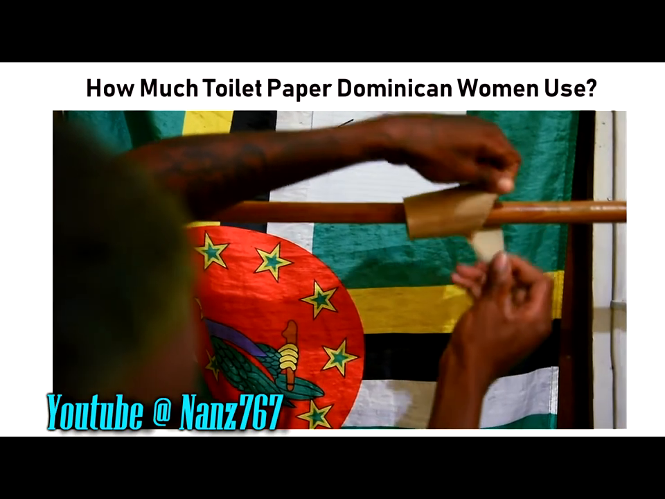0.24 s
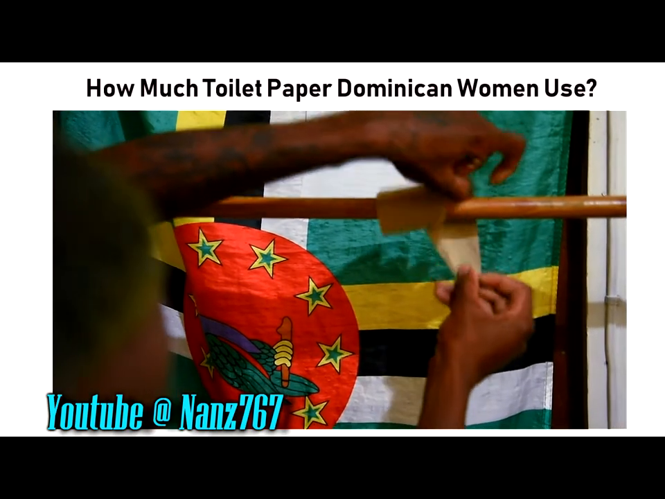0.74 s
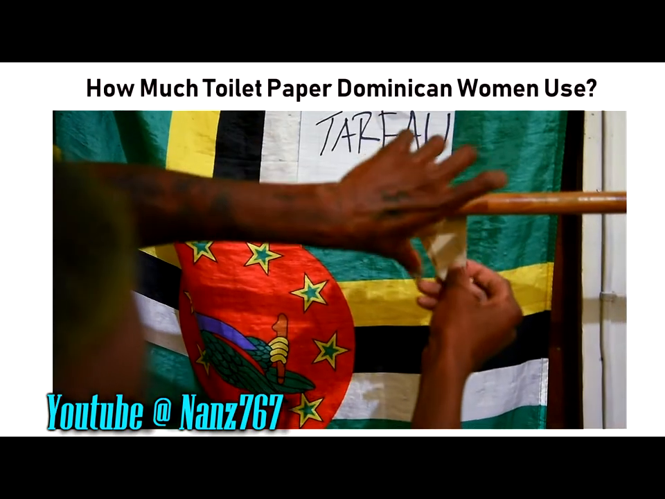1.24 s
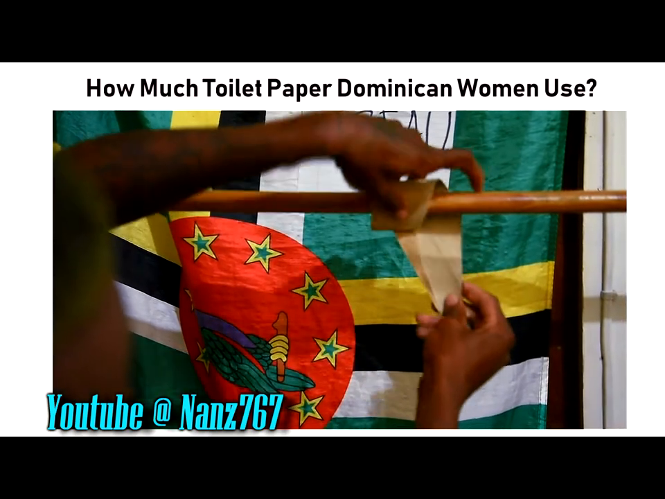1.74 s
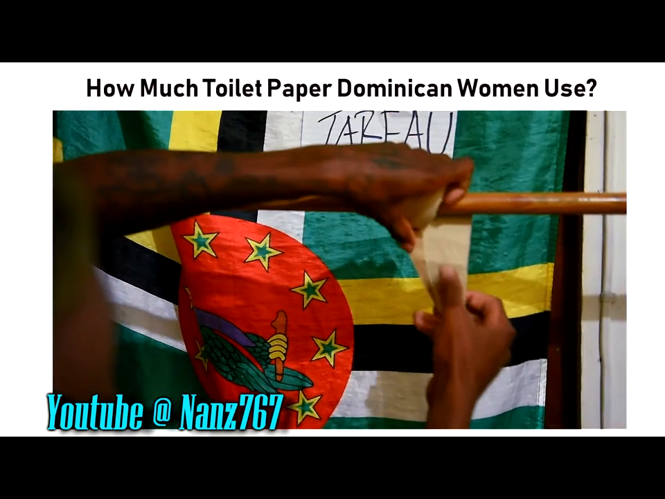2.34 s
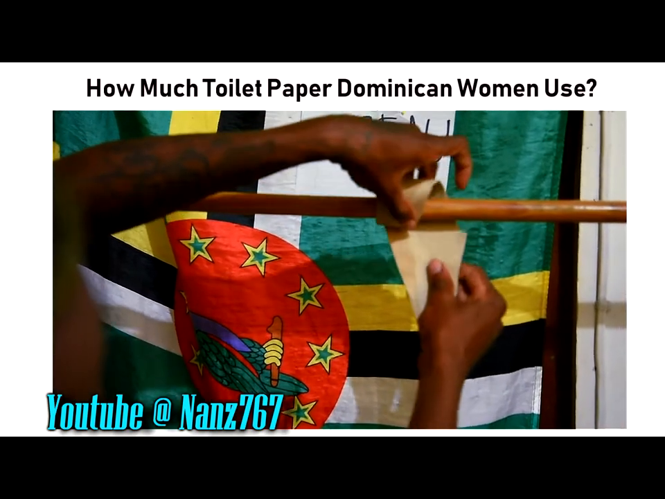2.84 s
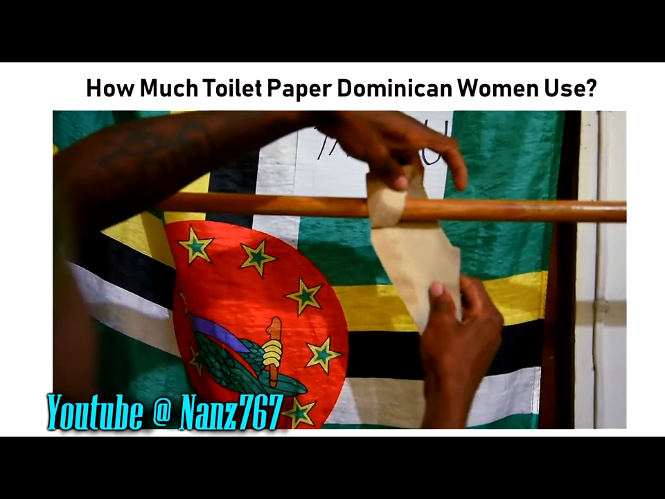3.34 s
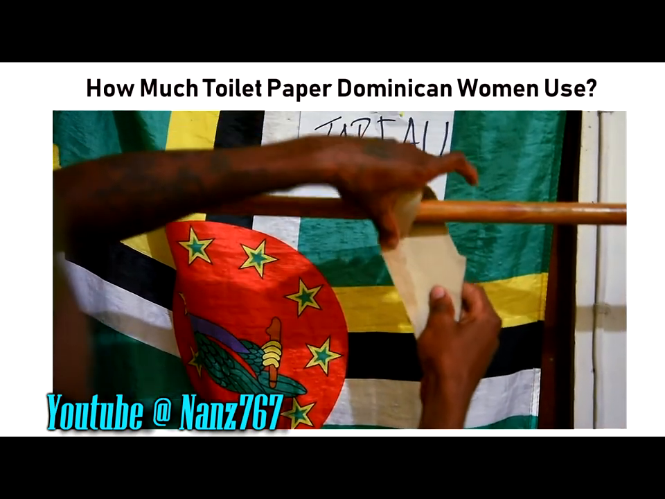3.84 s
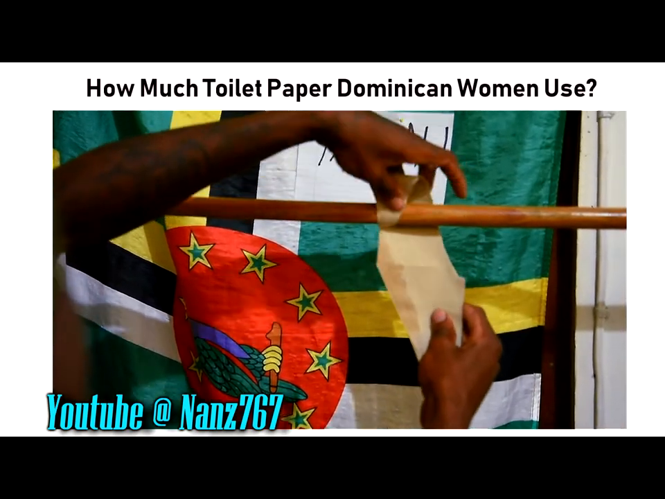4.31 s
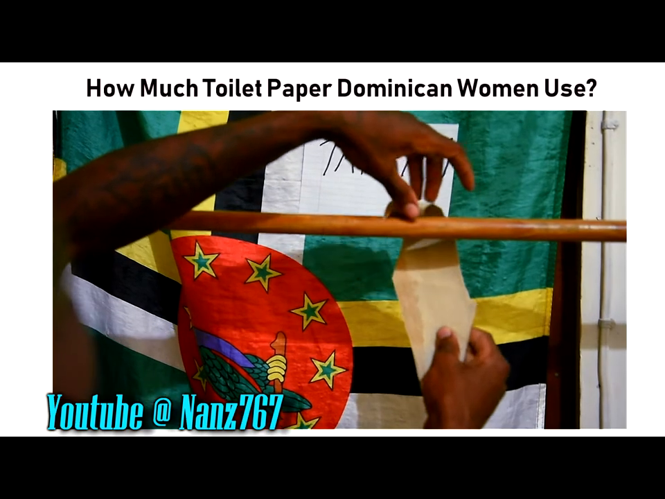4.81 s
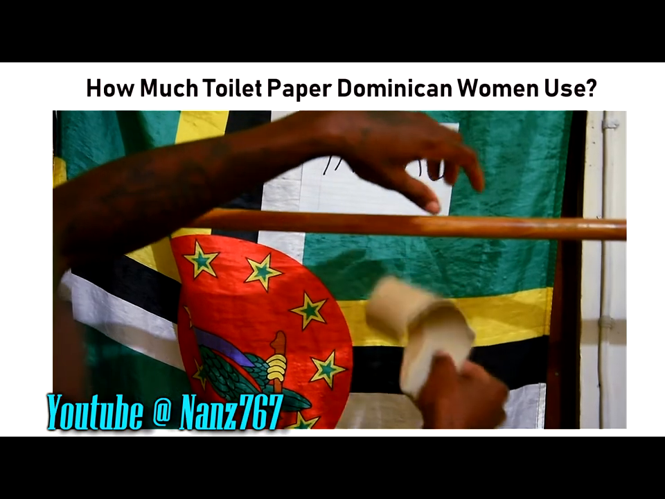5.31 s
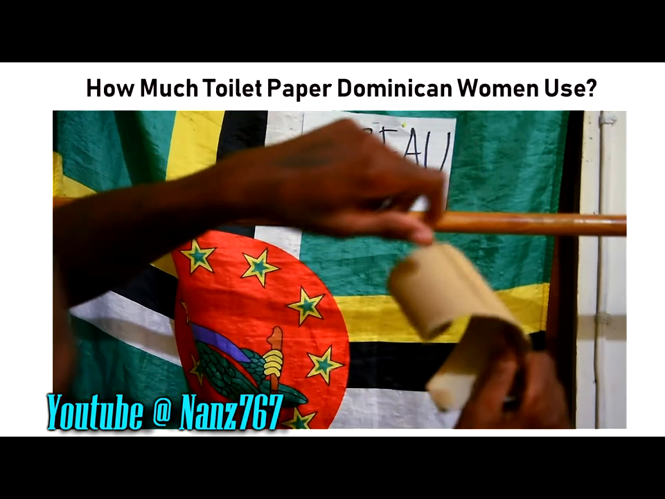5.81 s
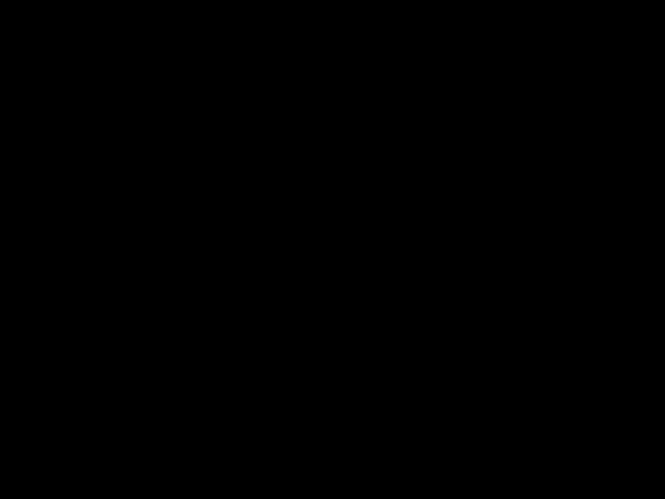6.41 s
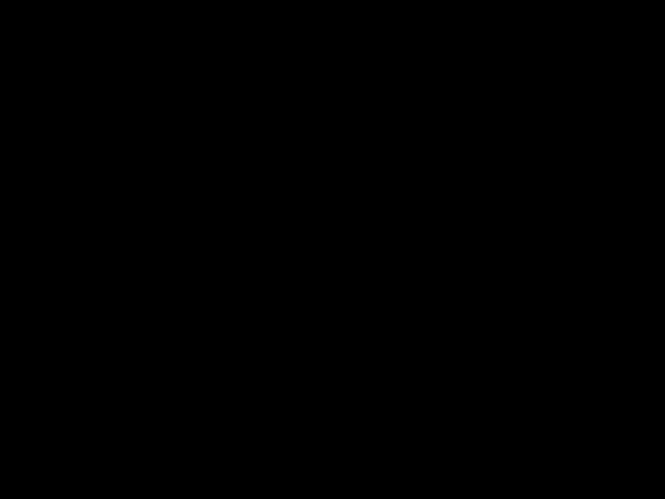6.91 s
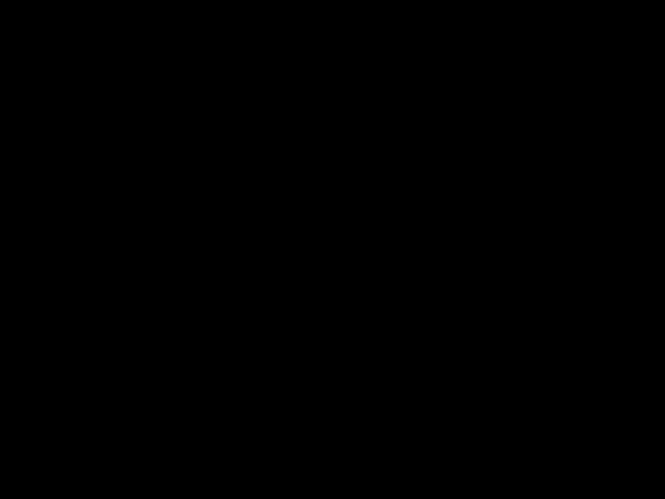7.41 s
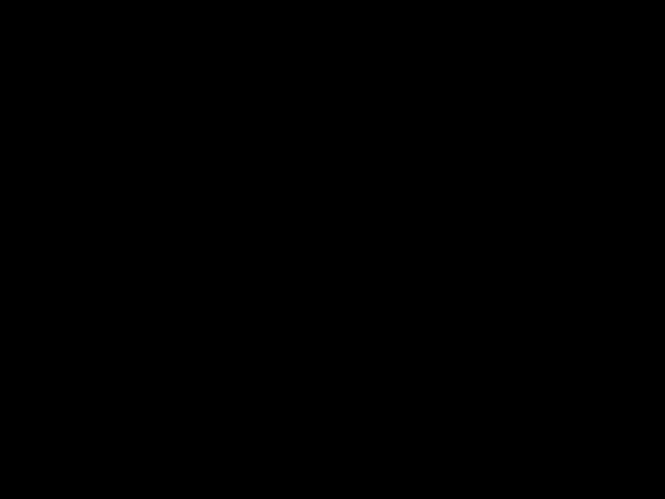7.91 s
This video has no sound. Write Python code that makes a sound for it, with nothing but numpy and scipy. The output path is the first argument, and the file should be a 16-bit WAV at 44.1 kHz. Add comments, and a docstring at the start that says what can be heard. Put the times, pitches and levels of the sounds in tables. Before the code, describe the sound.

Harsh close paper crackle in bursts with a quiet gap, followed by a churning toilet flush that gurgles empty and fades to faint bubbling refill.

```python
"""Paper roll, then toilet flush.

A stiff paper roll is tugged round a wooden rod in short pulls, so close that the microphone overloads:
clumps of tiny snaps, filtered rubbing noise, large creases and hollow bumps of the roll.
Then a toilet flushes: noise and swarms of gliding sine bubbles ring the bowl, trap, throat and rim;
it drains, gulps, leaves single bubbles and refills over a faint room hum."""
import sys
import numpy as np
from scipy import signal
from scipy.io import wavfile
from scipy.ndimage import uniform_filter1d

SR = 44100
rng = np.random.default_rng(int(sys.argv[2]) if len(sys.argv) > 2 else 0)


def unload_audio(sound):
    """Save the sound as a 16-bit wav file, at the path given as the first command line argument."""
    columns = np.transpose(np.atleast_2d(sound))
    # keep every value between -1 and 1, then stretch to whole-number steps
    steps = np.round(np.clip(columns, -1, 1) * 32767)
    wavfile.write(sys.argv[1], SR, steps.astype(np.int16))


N = 359415
TIME = np.arange(N) / SR
BINS_HZ = np.fft.rfftfreq(8192, 1 / SR)


def gain_of(db):
    """Decibels to gain."""
    return 10 ** (np.asarray(db) / 20)


def evened(x):
    """Scales to rms 1."""
    return x / np.sqrt(np.mean(x ** 2) + 1e-20)


def smoothed(x, size):
    """Running mean over size samples, applied twice."""
    return uniform_filter1d(uniform_filter1d(x, size), size)


def steadied(x, size=2200):
    """Holds the running rms near 1 and keeps the fast grain."""
    return x / np.sqrt(abs(smoothed(x ** 2, size)) + 1e-12)


def read(points, hz=BINS_HZ):
    """Joins spectrum points (Hz, dB) on a log-frequency axis."""
    f, db = np.transpose(points)
    return np.interp(np.log(hz + 1), np.log(f), db)


def humps(modes, hz=BINS_HZ):
    """Resonances as bell-shaped rises or dips in dB."""
    return sum(db / (1 + (2 * (hz - f) / width_hz) ** 2) for f, width_hz, db in modes)


def level(rows):
    """A curve of (s, dB) as a gain in time, at -120 dB outside the curve."""
    return gain_of(np.interp(TIME, *np.transpose(rows), left=-120, right=-120))


def add(mix, s, sound):
    """Mixes a sound in at s seconds."""
    part = mix[max(round(s * SR), 0):][:len(sound)]
    part += sound[:len(part)]


def tint(x, db):
    """Causal minimum-phase filter with the given dB on BINS_HZ."""
    log_gain = np.log(gain_of(np.maximum(db, -100)))
    whole = np.concatenate([log_gain, log_gain[-2:0:-1]])
    taps = np.fft.ifft(np.exp(np.conj(signal.hilbert(whole)))).real
    return signal.oaconvolve(x, taps[:len(BINS_HZ)])[:len(x)]


def noise(db):
    """Steady noise of rms 1 with the given spectrum."""
    return evened(tint(rng.standard_normal(N), db))


def flutter(depth_db, size):
    """A random gain that wanders over about size samples, depth_db rms."""
    return gain_of(depth_db * evened(smoothed(rng.standard_normal(N), size)))


def shower(grains, per_s, spread_db):
    """Scatters grains at random moments, their levels spread exponentially in dB."""
    size = gain_of(spread_db * np.minimum(rng.exponential(1, N), 4))
    size = size * (rng.random(N) < per_s / SR)
    kind = rng.integers(0, len(grains), N)
    out = np.zeros(N)
    for at in np.flatnonzero(size):
        add(out, at / SR, size[at] * grains[kind[at]])
    return out


def reflect(x, t60, wet_db):
    """Adds a dense, decaying tail from hard surfaces nearby."""
    t = TIME[:16000]
    tail = rng.standard_normal(len(t)) * gain_of(-60 * t / t60) * (t > .002)
    return x + gain_of(wet_db) * signal.oaconvolve(x, tail / np.linalg.norm(tail))[:N]


def stroke(length, attack_s, release_db_per_s, swell_db=0):
    """Envelope of one push: linear attack, a hold that swells or sags in dB, then a release."""
    t = TIME[:SR]
    hold_db = swell_db * (np.minimum(t / length, 1) - .5)
    release_db = release_db_per_s * np.maximum(t - length, 0)
    return np.minimum(t / attack_s, 1) * gain_of(hold_db - release_db)


def snap(hz, t60, ring, crack):
    """A crease gives way: a sharp crack, a burst of noise and a brief ring of the sheet."""
    t = TIME[:2600]
    burst = 0.72 * rng.standard_normal(len(t)) * gain_of(-60 * t / t60)
    edge = crack * np.cos(2 * np.pi * hz * t) * np.exp(-t / 0.00014)
    ringing = ring * np.sin(2 * np.pi * hz * t) * gain_of(-60 * t / (1.58 * t60))
    return edge + burst + ringing


def bubble(hz, t60, rise=0.18):
    """A bubble rings and rises in pitch, by the fraction rise over t60, as it nears the surface."""
    t = TIME[:8000]
    turns = np.cumsum(hz * (1 + rise * np.minimum(t / t60, 1))) / SR
    onset = 1 - np.exp(-t * hz / 0.38)
    return np.sin(2 * np.pi * turns) * gain_of(-60 * t / t60) * onset


def slosh(x, depth_db):
    """The water level heaves: uneven playback speed drifts the resonances a little up and down."""
    position = np.cumsum(flutter(depth_db, size=2500))
    return np.interp(position / position[-1] * TIME[-1], TIME, x)


def cavity(modes):
    """Turbulent water blows the low resonances of an air pocket: noise through summed peaks."""
    gain = sum(gain_of(db) / (1 + ((BINS_HZ - hz) / half_width_hz) ** 2) for hz, half_width_hz, db in modes)
    return steadied(slosh(noise(20 * np.log10(gain)), depth_db=.05), size=2000)


# Room noise spectrum. Each row: frequency in Hz, relative level in dB.
ROOM_SPECTRUM = [(30, -31), (55, -32.5), (80, -8), (120, -14.5), (160, -14.5), (200, -0.5), (280, -13),
                 (600, -14), (1100, -29.5), (4000, -32), (15000, -50)]


def background(room_db=-56):
    """A low hum and filtered noise of the quiet room, fading after the first pulls."""
    hum = gain_of(-50) * np.sin(2 * np.pi * 118.4 * TIME) * flutter(1.2, size=5000)
    room = gain_of(room_db) * noise(read(ROOM_SPECTRUM))
    return (hum + room) * level([(0, 6), (2.6, -3), (2.68, -34), (8.2, -17)])


# Wash of the refill water. Each row: frequency in Hz, relative level in dB.
REFILL_SPECTRUM = [(20, -6.5), (45, -17.5), (75, -16), (130, 3), (200, -1), (370, -12), (470, -22.5),
                   (1000, -6), (2500, -7), (4200, -4.5), (8000, -15), (15000, -21.5)]
# Course of the tank refill. Each row: time in seconds, relative level in dB.
REFILL_LEVEL = [(3.8, -75), (3.87, -54), (4.9, -27.5), (5.7, -31.5), (6.3, -35.5), (7.2, -35), (7.4, -36),
                (8.15, -42.5)]


def trickle(drip_db=-2, tick_db=-12, wash_db=-5):
    """Refill water runs down the bowl: a wash, small drips and the ticks of bursting foam."""
    drips = [bubble(hz, 75 / hz) * (hz / 1000) ** -.3 for hz in np.geomspace(800, 4600, 40)]
    drips = reflect(shower(drips, per_s=170, spread_db=3.4), t60=.15, wet_db=-9)
    ticks = [snap(hz, 0.0069, ring=0.94, crack=1.5) for hz in np.geomspace(6000, 14000, 12)]
    ticks = shower(ticks, per_s=13, spread_db=-4.0)
    ticks = tint(ticks, read([(1000, -45), (5000, -2.5), (10000, -8)]))
    wash = gain_of(wash_db) * noise(read(REFILL_SPECTRUM))
    water = gain_of(drip_db) * evened(drips) + gain_of(tick_db) * evened(ticks) + wash
    return water * level(REFILL_LEVEL)


# Waste pipe noise. Each row: frequency in Hz, relative level in dB.
DRAIN_SPECTRUM = [(20, -2), (40, -17), (65, -4), (90, 1), (130, -18), (300, -34), (1000, -70)]
DRAIN_OPENS_S, DRAIN_PEAK_S, DRAIN_RISE_DB_PER_S, DRAIN_FALL_DB_PER_S = 3.85, 5.5, 7, 8.5


def drain(drain_db=-41):
    """Water tumbles down the waste pipe, most of all while the bowl empties: low noise that swells."""
    since = TIME - DRAIN_PEAK_S
    swell_db = np.minimum(DRAIN_RISE_DB_PER_S * since, -DRAIN_FALL_DB_PER_S * since)
    return gain_of(drain_db + swell_db) * noise(read(DRAIN_SPECTRUM)) * (TIME > DRAIN_OPENS_S)


# Single bubbles. Each row: start in seconds, relative level in dB, nominal pitch in Hz, t60 in seconds.
SINGLE_BUBBLES = [(4.029, -13, 360, 0.04), (4.956, -8, 218, 0.07), (6.5655, -15.5, 1770, 0.14),
                  (6.7283, -21, 1145, 0.077), (6.737, -19, 2066, 0.053), (6.7755, -20, 1370, 0.034),
                  (6.8135, -19, 1056, 0.089), (6.839, -16, 1170, 0.07), (6.877, -19.5, 1430, 0.081),
                  (7.0, -10.5, 700, 0.16), (7.468, -21, 4180, 0.034), (7.478, -23, 1450, 0.079),
                  (7.523, -18, 1244, 0.11), (7.564, -17, 1486, 0.076), (7.5918, -21, 1130, 0.092),
                  (7.7029, -27, 3270, 0.051), (7.721, -27, 1134, 0.094), (7.7455, -24, 1060, 0.11),
                  (7.8215, -27, 1940, 0.048), (7.889, -20, 4200, 0.034), (7.941, -14, 299, 0.27),
                  (8.037, -20, 1230, 0.05), (8.0726, -26, 4000, 0.044), (8.1284, -20, 1125, 0.082)]


def gurgles(bubble_db=-3):
    """Single bubbles and gulps, decaying sines echoed by the bowl."""
    out = np.zeros(N)
    for s, db, hz, t60 in SINGLE_BUBBLES:
        add(out, s, gain_of(db) * bubble(.97 * hz, t60, rise=0.071))
    return gain_of(bubble_db) * reflect(out, t60=0.34, wet_db=-11.5)


# Water slaps shut and throws a cloud of bubbles. Each row: start in seconds, length in seconds,
# relative level in dB, central pitch in Hz, pitch spread in octaves.
BUBBLE_CLOUDS = [(5.169, 0.055, -25, 2790, 0.61), (5.626, 0.045, -26.5, 5570, 1.07),
                 (6.012, 0.044, -31, 3360, 0.14), (6.087, 0.025, -26.5, 3500, 0.15),
                 (6.179, 0.031, -37, 5330, 0.27), (6.365, 0.025, -18.5, 3350, 0.12),
                 (6.415, 0.015, -18, 3650, 0.13), (6.503, 0.065, -34, 4430, .27),
                 (6.604, .036, -31, 2840, 0.63), (6.911, 0.042, -28, 3230, 0.49),
                 (7.167, 0.083, -29, 2600, 0.47), (7.241, 0.051, -20.5, 2230, 0.29),
                 (7.94, 0.018, -28.5, 1820, 0.21), (7.967, .02, -24, 2075, 0.16),
                 (7.971, 0.039, -28, 2550, 0.43)]


def slops(slop_db=1, count=70):
    """Each slop is a short, dense cloud of bubbles around one size."""
    out = np.zeros(N)
    for s, length, db, hz, octaves in BUBBLE_CLOUDS:
        cloud = np.zeros(SR // 4)
        starts, sizes, pitches = rng.random(count), rng.standard_normal(count), rng.standard_normal(count)
        for when, size, pitch in zip(starts, sizes, pitches):
            own_hz = hz * 2 ** (octaves * np.clip(pitch, -2, 2))
            add(cloud, when * length, size * bubble(own_hz, 55 / own_hz, rise=0.098))
        add(out, s, gain_of(db) * cloud * np.sqrt(length * SR) / np.linalg.norm(cloud))
    return gain_of(slop_db) * reflect(out, t60=0.15, wet_db=-1.5)


# Rim jet notes. Each row: frequency in Hz, half width in Hz at half gain, relative level in dB.
JET_MODES = [(1712, 17, -2.5), (1490, 12.6, -9)]


def jet(churning, jet_db=-11.5):
    """The rim jets sing a narrow note while the water runs hard: noise through sharp peaks."""
    course = level([(4.4, -2.5), (4.9, -6.5), (5.7, 1), (6.5, 2.5), (8.2, -10)])
    return gain_of(jet_db) * cavity(JET_MODES) * churning * course


# Flow of water through the bowl. Each row: time in seconds, relative level in dB.
FLOW_LEVEL = [(3.83, -52), (3.88, -18.5), (4.2, -29.5), (4.34, -20), (4.39, -10.5), (4.7, -17.5),
              (5.0, -16), (5.12, -19.5), (5.35, -17.5), (5.62, -16), (5.85, -18.5), (6.49, -19.5),
              (6.56, -33.5), (6.72, -44), (7.6, -48), (8.15, -48.5)]
# Start and end in seconds of the emptying: the ring passes from the trap to the throat.
EMPTYING_SPAN_S = [4.94, 5.93]
# Surges and gulps of water. Each row: start in seconds, length in seconds, then relative levels in dB
# of churning, trap ring, throat ring and splash.
WATER_SURGES = [(3.847, 0.056, -19.5, -29, -30, -26), (4.021, 0.014, -24, -16.5, -11.5, -10),
                (4.364, 0.032, -8, -16, -35, -30), (4.566, 0.023, -7.5, -27, -33, -18),
                (4.778, 0.074, -16.5, -32, -38, -30), (4.915, 0.05, -29, -22, -33, -29),
                (5.023, 0.014, -22, -36, -38, -32), (5.159, 0.036, -17, -23, -40, -17.5),
                (5.95, 0.044, -19, -36, -23, -24.5), (6.41, 0.06, -19.5, -44, -25, -43),
                (6.582, 0.059, -30, -30.5, -53, -27), (6.798, .035, -33.5, -61, -45, -28),
                (6.928, 0.079, -20, -31.5, -43, -27), (7.017, 0.13, -21, -39, -16.5, -28.5),
                (7.149, 0.11, -21, -34, -18.5, -24.5), (7.93, 0.044, -27, -33, -35.5, -34)]
SURGE_ATTACK_S, SURGE_RELEASE_DB_PER_S = 0.02, 288
TRAP_FULL_DB, TRAP_EMPTY_DB, THROAT_FULL_DB, THROAT_EMPTY_DB = -6, -14, -12.5, -6.5  # against the flow
SPLASH_DB, SPLASH_DB_PER_FLOW_DB = -11, 0.8
HEAD_DB, HEAD_END_S = 4, 4.76  # early splash is louder, then drops at once


def flowing(heave_db=1.7):
    """Gains of churning, trap, throat and splash: all follow the flow, and surges add power."""
    flow = level(FLOW_LEVEL) * flutter(heave_db, size=1600)
    trap = flow * gain_of(np.interp(TIME, EMPTYING_SPAN_S, [TRAP_FULL_DB, TRAP_EMPTY_DB]))
    throat = flow * gain_of(np.interp(TIME, EMPTYING_SPAN_S, [THROAT_FULL_DB, THROAT_EMPTY_DB]))
    head_db = np.where(TIME <= HEAD_END_S, HEAD_DB, 0)
    splash = flow ** SPLASH_DB_PER_FLOW_DB * gain_of(SPLASH_DB + head_db)
    powers = np.array([flow, trap, throat, splash]) ** 2
    for s, length, *levels_db in WATER_SURGES:
        shape = stroke(length, SURGE_ATTACK_S, SURGE_RELEASE_DB_PER_S)
        for power, db in zip(powers, levels_db):
            add(power, s, (gain_of(db) * shape) ** 2)
    return np.sqrt(powers)


# Spectra of churning and splash. Each row: frequency in Hz, relative level in dB.
CHURN_SPECTRUM = [(25, -30), (70, -30.5), (130, -26.5), (220, -3), (470, -4), (580, -16), (680, 0),
                  (880, -2), (1200, -1), (1600, -7.5), (2500, -32), (5000, -25), (15000, -22)]
SPLASH_SPECTRUM = [(500, -26.5), (1000, -9.5), (1500, -9.5), (2200, 2), (2900, -9), (3700, 1), (4600, -6),
                   (6000, -10), (8000, -15.5), (13000, -35.5), (16000, -26)]
# Resonances of bowl and rim. Each row: frequency in Hz, width in Hz at half the dB, rise in dB.
BOWL_MODES = [(448, 70, 3), (663.5, 38, 9.6), (712, 32, 13.7), (757, 70, 6.1), (1050, 18, 13.2),
              (1102, 42, 10)]
RIM_MODES = [(1300, 55, 11), (1457, 110, 13), (1470, 60, -12), (1812, 38, 4.5), (1730, 190, 5),
             (2077, 44, -8), (2826, 98, 9.5), (3210, 160, 3), (4050, 110, 3.5)]
# Air pockets in trap and throat. Each row: frequency in Hz, half width in Hz at half gain,
# relative level in dB.
TRAP_MODES = [(262, 43, -13), (281, 15.6, 19), (310, 18, 9)]
THROAT_MODES = [(345, 22, -8), (374, 12.8, 10), (390, 54, -3)]


def churn():
    """Large bubbles and rough noise ring the bowl."""
    large = [bubble(hz, 30 / hz) for hz in np.geomspace(450, 2200, 40)]
    bubbles = 0.34 * evened(shower(large, per_s=460, spread_db=3.5))
    rough = bubbles + rng.standard_normal(N) * flutter(0.4, size=400)
    ringing = tint(rough, read(CHURN_SPECTRUM) + humps(BOWL_MODES))
    return steadied(slosh(ringing, depth_db=0.01))


def splash(spray_db=1):
    """Swarms of small bubbles and fluttering spray noise ring under the rim."""
    small = [bubble(hz, 36 / hz) for hz in np.geomspace(1000, 6000, 60)]
    bubbles = evened(shower(small, per_s=1600, spread_db=3.5))
    spray = gain_of(spray_db) * evened(rng.standard_normal(N) * flutter(4.5, size=200))
    echoed = reflect(bubbles + spray, t60=0.12, wet_db=-3.5)
    return steadied(tint(echoed, read(SPLASH_SPECTRUM) + humps(RIM_MODES)), size=1400)


def flush(churning, trap, throat, splashing):
    """Churning, ringing air pockets and splash, each driven by its own flow gain."""
    fade_in_db = np.interp(TIME, [4.3, 4.92], [-10, 0])  # churn and splash fade in under the last pulls
    water = gain_of(0.71 * fade_in_db) * churn() * churning
    pockets = cavity(TRAP_MODES) * trap + cavity(THROAT_MODES) * throat
    return water + pockets + gain_of(fade_in_db) * splash() * splashing


# Hiss lingering after the pull. Each row: frequency in Hz, relative level in dB.
LINGER_SPECTRUM = [(600, -39), (1400, -31.5), (2200, -17.5), (3100, -2), (3800, -11), (4600, -0.5),
                   (6800, -18.5), (9000, -10.5), (10700, -35), (12500, -9.5), (15000, -25)]
# Course of the hiss. Each row: time in seconds, relative level in dB.
LINGER_LEVEL = [(.9, -41), (.95, -40), (1.07, -44), (1.2, -50), (1.45, -51), (1.58, -55), (1.66, -75)]


def linger(linger_db=-2, fading_db=-44):
    """A faint, coloured noise hiss lingers after the pull; its lower part dies first."""
    lower = noise(read([(700, -21.0), (1400, -10.5), (1950, -0.5), (2700, -5), (4000, -11.5), (12000, -20)]))
    fading = gain_of(fading_db) * lower * level([(.9, 4), (1.05, -1), (1.22, -24)])
    return fading + gain_of(linger_db) * noise(read(LINGER_SPECTRUM)) * level(LINGER_LEVEL)


# The hollow roll bumps against the rod. Each row: start in seconds, level in dB, pitch in Hz.
ROLL_BUMPS = [(.246, -2, 616), (.264, -11, 594), (2.792, -28, 690), (2.821, -26, 520), (2.873, -11, 716),
              (2.977, -9, 467)]
BUMP_T60_S, BUMP_RISE_S = 0.025, 0.00065


def bumps():
    """Each bump is a soft, short sine ring of the cardboard tube."""
    out, t = np.zeros(N), TIME[:SR // 8]
    shape = (1 - np.exp(-t / BUMP_RISE_S)) * gain_of(-60 * t / BUMP_T60_S)
    for s, db, hz in ROLL_BUMPS:
        add(out, s, gain_of(db) * shape * np.sin(2 * np.pi * hz * t))
    return out


# Creases that snap. Each row: start in seconds, relative level in dB, pitch in Hz,
# t60 of the burst in seconds.
CREASE_SNAPS = [(0.036, -13.5, 1410, 0.042), (0.064, -11, 5130, 0.019), (0.123, 15, 2210, 0.0056),
                (0.176, 7.5, 4570, 0.036), (0.219, 2, 4320, 0.022), (0.336, 11, 1260, 0.026),
                (0.528, 4, 1473, 0.041), (0.555, -2, 1370, 0.03), (0.607, -7.5, 1600, 0.017),
                (0.767, 7, 2680, 0.02), (1.78, -13, 1620, 0.024), (1.823, -1.5, 1570, 0.02),
                (1.833, -6, 2200, 0.029), (1.845, -2, 2430, 0.022), (1.877, 24, 1850, 0.0052),
                (1.906, -1.5, 2270, 0.019), (1.931, 3.5, 2080, 0.011), (1.953, -3.5, 2760, 0.025),
                (2.059, 4.5, 1970, 0.014), (2.139, 1, 3130, 0.016), (2.269, 0, 1070, 0.017),
                (2.373, 6, 1130, 0.014), (2.564, -4, 1990, 0.02), (2.603, 0, 1190, 0.019),
                (2.875, -10, 3400, 0.02), (2.893, -4.5, 3000, 0.012), (2.905, -0.5, 1270, 0.024),
                (2.942, -8, 1090, 0.024), (3.009, -2.5, 4100, 0.048), (3.043, -6, 3420, 0.031),
                (3.074, -7, 2730, 0.046), (3.133, -7, 1210, 0.014), (3.645, -17.5, 2780, 0.042),
                (3.945, -2, 1830, 0.036), (3.979, -2, 1860, 0.019), (4.035, 1.5, 1634, 0.03),
                (4.09, -5, 3660, 0.022), (4.144, 1.5, 3650, 0.016), (4.171, -1, 3020, 0.013),
                (4.252, -3, 1540, 0.038), (4.281, 0, 1860, 0.012), (4.304, 6, 2150, 0.02),
                (4.348, 2, 2700, 0.024), (4.536, 0.5, 3740, 0.022), (4.702, 8, 2600, 0.011)]
# Paper colour, for creases and crackle. Each row: frequency in Hz, relative level in dB.
PAPER_SPECTRUM = [(100, -37), (250, -9), (400, -5.5), (570, -4.5), (1000, -6), (1800, -2), (3500, -4.5),
                  (6000, -5), (9000, -5.5), (13000, -8), (16000, -8.5)]


def creases(snap_db=5):
    """The large snaps of the paper, filtered by its colour."""
    out = np.zeros(N)
    for s, db, hz, t60 in CREASE_SNAPS:
        add(out, s, gain_of(db) * snap(hz, t60, ring=0.23, crack=1.77))
    return gain_of(snap_db) * tint(out, read(PAPER_SPECTRUM))


# Pulls on the paper. Each row: start in seconds, length in seconds, relative crackle level in dB,
# swell from start to end in dB, relative flapping level in dB, brightness in dB per octave,
# hollow ring of the roll in dB, snapping against rubbing from 0 to 1.
PAPER_PULLS = [(0, 0.036, -23, -27, -43, 0.5, 2, .3), (.049, 0.11, -8, 7.5, -30, 3, 9.5, 0.64),
               (0.174, .19, -8.5, 4.5, -20, 3, 14, 0.62), (0.372, 0.19, -4.5, -13, -18.5, .5, 1.5, 0.7),
               (.575, 0.054, -16.5, -3, -32, 1, 9.5, 0.3), (0.639, 0.024, -19, 9.5, -31, 5, 19.5, 0.23),
               (0.66, 0.14, -33.5, -15, -40, -1.5, -5, 0.27), (0.76, 0.11, -6.5, 19, -20.5, 0.5, 4.5, 0.45),
               (1.753, 0.075, -30.5, 10, -41, 0.5, -2.5, 0.4),
               (1.809, 0.16, -14.5, -2.5, -21.5, -1.5, 0.5, .7), (1.964, 0.16, -24, 26, -29, 1, 3, 0.2),
               (2.063, 0.094, -4.5, -5.5, -15, -0.5, 7, 0.7), (2.162, 0.12, -34, -7, -41, 1, 4, .3),
               (2.254, 0.051, -20.5, -0.5, -29.5, 0, 6, 0.18),
               (2.325, 0.051, -35.5, -6, -29.5, -1.5, 0, 0.7), (2.368, 0.099, -3.5, 12, -17.5, 0, 6, 0.6),
               (2.472, 0.055, -10.5, -1.5, -13, 4, 12, 0.6), (2.538, 0.088, -12.5, -1, -18.5, 1.5, 7, 0.8),
               (2.696, 0.16, -25.5, 8, -69, 6.5, 16, 0.64), (2.854, 0.068, -17, 5, -50, -0.5, 0, 1),
               (2.935, 0.058, -13, 0, -35, 2, 12.5, 0.18), (2.989, 0.021, -10, 13, -30, 4.5, 20, 0.54),
               (3.026, 0.16, -15.5, -2, -31, 1.5, 6, 0.75), (3.187, 0.23, -13.5, 3.5, -25.5, 0.5, 7, 0.3),
               (3.409, 0.12, -18.5, 5, -39, 1.5, 12.5, 0.27), (3.603, 0.12, -24, 10, -61, 8.5, 18.5, 0.4),
               (3.755, 0.038, -22, 6, -60, 5.5, 11, 0.1), (3.702, 0.053, -26.5, -4, -59, 6, 9, .3),
               (3.812, 0.099, -16, 6, -38, 4, 3, 0.3), (3.931, 0.03, -9.5, 0, -33, 2.5, -2, 0.8),
               (3.973, 0.19, -12.5, -1, -30, 3, 1.5, 1), (4.166, 0.1, -9, 1, -29, 1.5, -0.5, 1),
               (4.28, 0.21, -8.5, -0.5, -26.5, 1.5, 1, 1), (4.496, 0.17, -17, -6, -28.5, -3.5, -30, .8),
               (4.676, 0.15, -10.5, 7.5, -30, 0.5, -31, 1)]
# Crackle levels in dB of a light and of a firm pull.
LIGHT_FIRM_DB = [-13, -7.5]
LIGHT_ATTACK_S, FIRM_ATTACK_S, PULL_RELEASE_DB_PER_S = 0.015, 0.0091, 621.5


def pulling():
    """Gains of crackle and flapping; then power-weighted brightness, hollowness and snapping."""
    crackle, flap, colours = np.zeros(N), np.zeros(N), np.zeros((3, N))
    for s, length, db, swell_db, flap_db, *colour in PAPER_PULLS:
        attack_s = np.interp(db, LIGHT_FIRM_DB, [LIGHT_ATTACK_S, FIRM_ATTACK_S])
        shape = stroke(length, attack_s, PULL_RELEASE_DB_PER_S, swell_db)
        power = (gain_of(db) * shape) ** 2
        add(crackle, s, power)
        add(flap, s, (gain_of(flap_db) * shape) ** 2)
        for track, value in zip(colours, colour):
            add(track, s, value * power)
    return (np.sqrt(crackle), np.sqrt(flap), *(colours / (crackle + 1e-12)))


# Air pushed by the flapping sheet. Each row: frequency in Hz, relative level in dB.
FLAP_SPECTRUM = [(20, -36), (45, -33), (75, -12), (110, 4.5), (160, 5), (230, 3), (330, -1.5), (600, -14.5),
                 (2000, -92.5)]
# Resonances of the roll. Each row: frequency in Hz, width in Hz at half the dB, rise in dB.
ROLL_MODES = [(430, 170, 1), (580, 110, -2), (810, 780, -2)]


def bent(crackle, bright, hollow, patchy_db):
    """The colour shifts as the sheet bends: tilt, roll resonance and random patches on an STFT."""
    hz, t, z = signal.stft(crackle, SR, nperseg=512)
    bright, hollow = np.interp(t, TIME, bright), np.interp(t, TIME, hollow)
    patches = uniform_filter1d(rng.standard_normal(z.shape), 9, axis=0)
    patches = evened(uniform_filter1d(patches, 5, axis=1))
    octaves = np.log2(np.maximum(hz, 500) / 4000)
    roll_db = np.outer(humps([(770, 890, 1)], hz), hollow) + humps(ROLL_MODES, hz)[:, None]
    z = z * gain_of(np.outer(octaves, bright) + roll_db + patchy_db * patches)
    return signal.istft(z, SR, nperseg=512)[1][:N]


def paper(rub_db=-11.0, patchy_db=2.5, slip_db=3.0, crackle_db=-1):
    """Clumps of tiny snaps over the rubbing of the sheet, whose flapping pushes air as low noise."""
    effort, flapping, bright, hollow, snapping = pulling()
    pitches_hz = np.geomspace(900, 7000, 30)
    grains = [rng.choice([-1, 1]) * snap(hz, .007, ring=.3, crack=2.4) for hz in pitches_hz]
    snaps = evened(shower(grains, per_s=600, spread_db=4.0) * flutter(slip_db, size=130))
    snaps = snapping * reflect(snaps, t60=0.037, wet_db=-5.5)
    rubbing = gain_of(rub_db) * rng.standard_normal(N)
    crackle = tint(snaps + rubbing, read(PAPER_SPECTRUM))
    crackle = steadied(bent(crackle, bright, hollow, patchy_db), size=900)
    flap = steadied(noise(read(FLAP_SPECTRUM)), size=1200)
    return gain_of(crackle_db) * crackle * effort + flap * flapping


def scene():
    """Everything reaches one microphone, alike in both channels."""
    roll = paper() + creases() + bumps() + linger()
    churning, trap, throat, splashing = flowing()
    toilet = flush(churning, trap, throat, splashing) + jet(churning) + drain()
    toilet = toilet + slops() + gurgles() + trickle()
    mono = roll + toilet + background()
    return np.array([mono, mono])


EDGE_HZ = 15180


def record(dry, ceiling=0.88):
    """The microphone overloads at a hard ceiling; then a low-pass limits the band."""
    overloaded = np.clip(dry, -ceiling, ceiling)
    low_pass = signal.firwin(511, EDGE_HZ, window=("kaiser", 8), fs=SR)
    return signal.oaconvolve(overloaded, low_pass[None], "same")


dry = scene()
out = record(dry)
unload_audio(out)
```